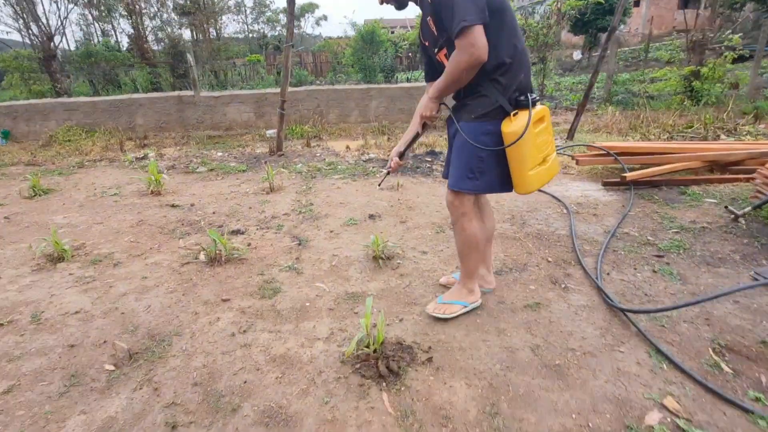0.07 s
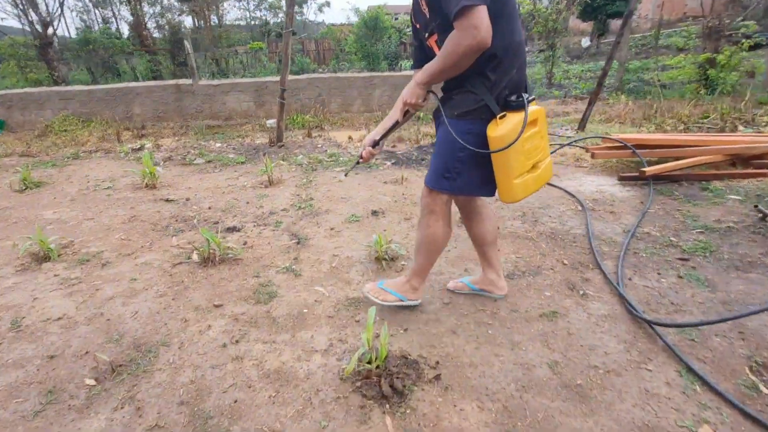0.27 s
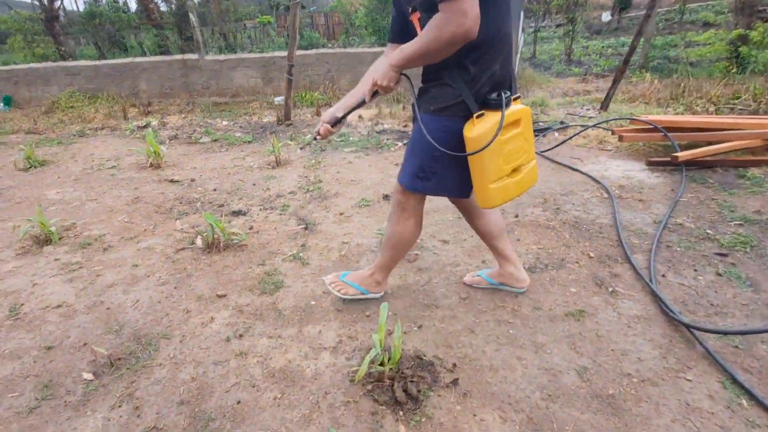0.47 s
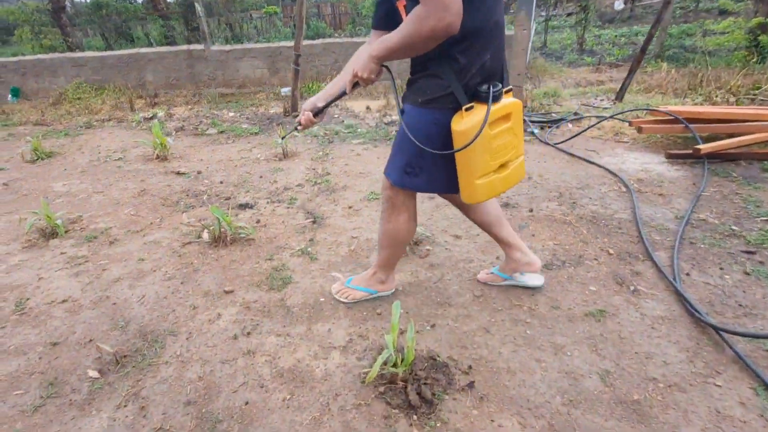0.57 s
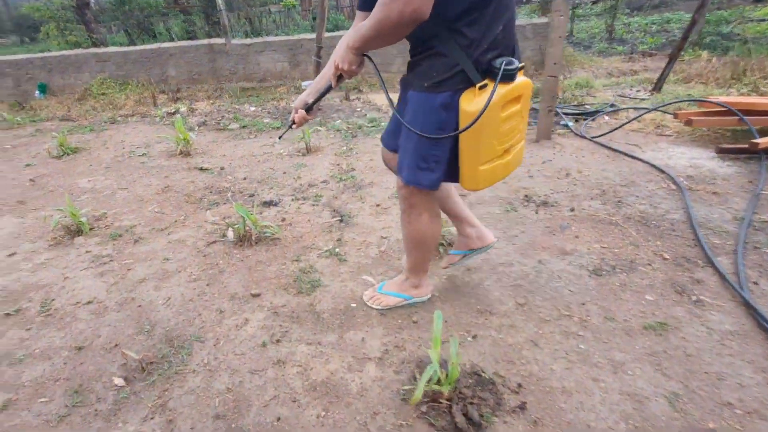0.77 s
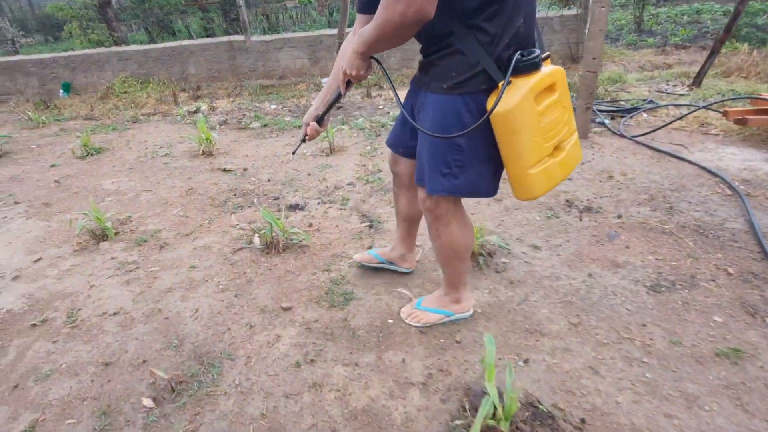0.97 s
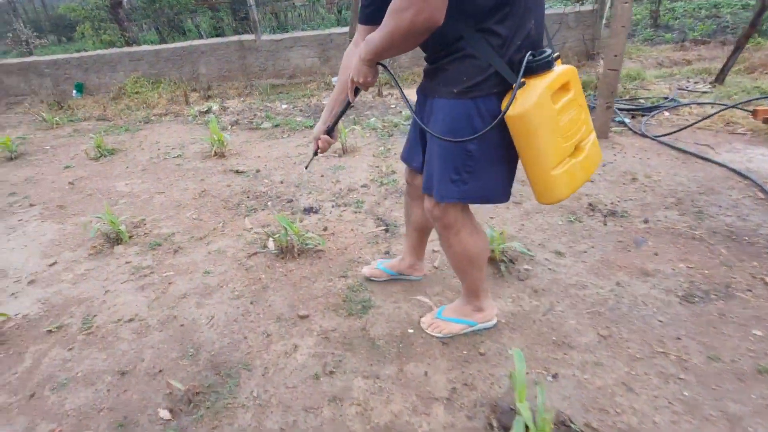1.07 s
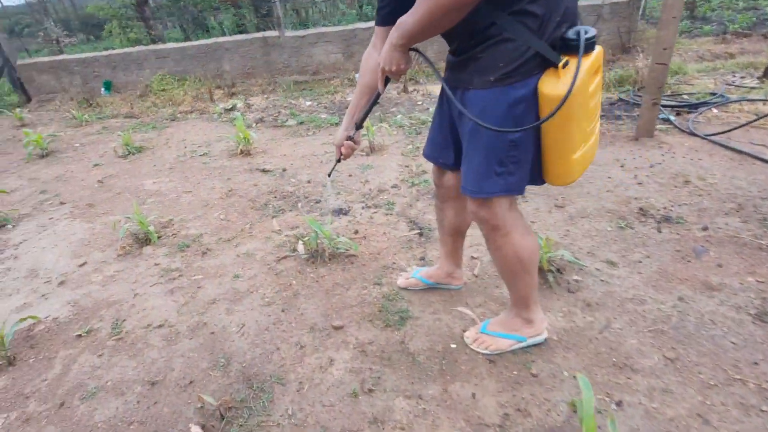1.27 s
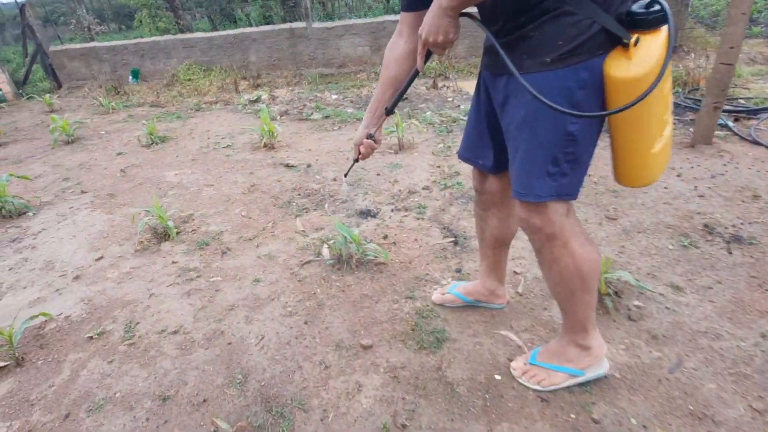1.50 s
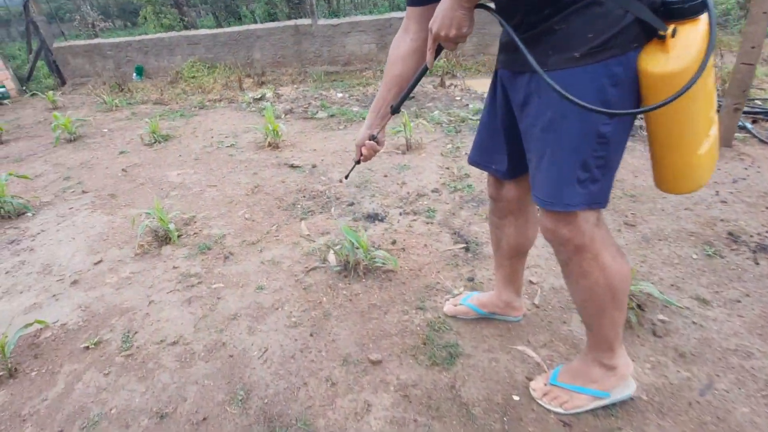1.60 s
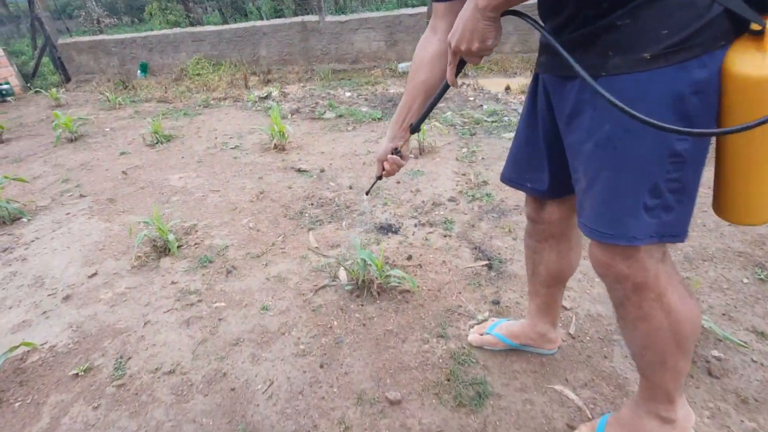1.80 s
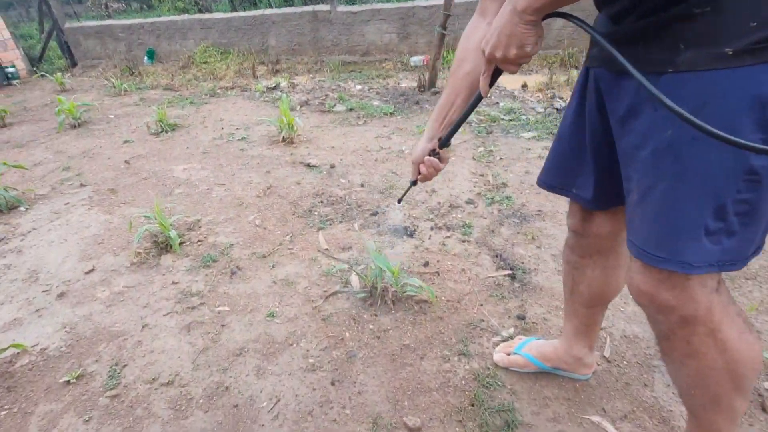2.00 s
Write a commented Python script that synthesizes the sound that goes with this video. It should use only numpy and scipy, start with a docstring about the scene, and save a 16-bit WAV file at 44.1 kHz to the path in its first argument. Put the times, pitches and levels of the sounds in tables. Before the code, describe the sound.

A pressure sprayer hisses twice, its mist pattering on the earth, after soft flip-flop steps scuff over gritty soil. The second squirt is louder and sizzles on leaves. The sounds are close, in a quiet garden with a faint bird chirp.

```python
"""Spraying the garden

A gardener in flip-flops crosses dry, gritty soil: soles scuff and thud, grit ticks.
Two squirts from a pressure sprayer hiss at the nozzle while the mist patters on the earth;
the second is closer and sizzles on a seedling. A small bird calls over quiet garden air."""
import sys
import numpy as np
from scipy.fft import rfft, irfft, next_fast_len
from scipy.io import wavfile
from scipy.ndimage import map_coordinates

SR = 44100
rng = np.random.default_rng(int(sys.argv[2]) if len(sys.argv) > 2 else 0)


def digitize_waveform(pressure):
    """Quantize a signal to 16-bit integers and store it at the path in sys.argv[1].

    Rows of a 2-D input are taken as channels; values are limited to [-1, 1].
    """
    field = np.atleast_2d(pressure).T
    bounded = np.clip(field, -1, 1)
    quanta = np.round(bounded * 32767).astype(np.int16)
    wavfile.write(sys.argv[1], SR, quanta)


N = 90404
DROPS_PER_S, DROP_SPREAD_DB = 2200, 2

# Wide stereo image of scattered sounds: freq_hz, left-right likeness (0-1)
SCATTERED_IMAGE = [(100, 0.93), (600, 0.39), (1500, 0.38), (2800, 0.073), (8000, 0.15), (14000, 0.13)]


def amp(db):
    return 10 ** (np.asarray(db) / 20)


def unit(x):
    return x / np.sqrt(np.mean(x ** 2) + 1e-20)


def along(points, hz):
    """Reads a curve of (freq_hz, value) points on a log axis."""
    freqs, values = np.transpose(points)
    return np.interp(np.log(hz + 1), np.log(freqs + 1), values)


def filtered(x, response):
    """EQs x with a gain given as a function of frequency."""
    size = next_fast_len(N + 8192)
    return irfft(rfft(x, size) * response(np.fft.rfftfreq(size, 1 / SR)), size)[..., :N]


def delayed(x, curve, share=1):
    """Delays one channel by a share of a (time_s, delay_ms) curve."""
    n = np.arange(N)
    lag = np.interp(n / SR, *np.transpose(curve)) * SR / 1000
    return map_coordinates(x, [n - share * lag], order=5, mode="mirror")


def wobble(per_s):
    """A smooth random curve with per_s knots a second."""
    knots = rng.standard_normal(int(N * per_s / SR) + 4)
    return map_coordinates(knots, [np.arange(N) * per_s / SR])


def noise():
    """Two unrelated white noises."""
    return rng.standard_normal((2, N))


def impacts(per_s, spread_db):
    """Two streams of tiny random impacts of uneven size."""
    hits = rng.random((2, N)) < per_s / SR
    return hits * np.sign(noise()) * amp(spread_db * np.clip(noise(), -2, 2))


def placed(pair, spectrum, image=None):
    """Colours two streams and spreads them to stereo at rms 1, the bass narrower than the treble."""
    # Default stereo image, for near sounds: freq_hz, left-right likeness (0-1)
    near_image = [(100, 0.65), (1400, 0.87), (2400, 0.45), (5000, 0.6), (7500, 0.44), (14000, 0.4)]

    def mid_side_gains(hz):
        likeness = along(near_image if image is None else image, hz)
        angle = np.arccos(np.clip(likeness, -1, 1)) / 2
        return amp(along(spectrum, hz)) * [np.cos(angle), np.sin(angle)]

    mid, side = filtered(pair, mid_side_gains)
    return unit(np.array([mid + side, mid - side]))


def stroke(start_s, length_s, rise_s, fall_s):
    """Envelope: linear attack, hold, exponential release."""
    t = np.arange(N) / SR - start_s
    return np.clip(t / rise_s, 0, 1) * np.exp(-np.maximum(t - length_s, 0) / fall_s)


def garden():
    """A bed of faint outdoor air over a distant rumble, both wavering slightly."""
    # Colours of the air and the rumble: freq_hz, level_db
    air_eq = [(100, -6), (220, -6.5), (370, -1.5), (750, -13), (1300, -6.5), (2200, -0.5), (3400, -2),
              (4400, -2), (5600, -3.5), (8100, -4.5), (9100, -16), (10100, -15), (11000, -11), (13800, -8),
              (15500, -14)]
    rumble_eq = [(20, -45), (35, -28), (55, 4.5), (110, 2.5), (200, -11.5), (500, -34)]
    air = amp(-58 + 0.8 * wobble(12)) * placed(noise(), air_eq, SCATTERED_IMAGE)
    rumble = amp(-70 + 0.67 * wobble(7.3)) * placed(noise(), rumble_eq)
    return air + rumble


def bird():
    """Thin, raspy notes from the hedge: narrow bands of noise that glide in pitch."""
    # The call: start_s, length_s, start_hz, end_hz, level_db, rasp_hz
    notes = [(.412, .078, 7150, 8100, -53, 260), (.608, .04, 5700, 4400, -59.5, 200),
             (.644, .028, 4280, 3980, -62, 70), (.62, .06, 6600, 7700, -65, 170)]
    out = np.zeros((2, N))
    for start_s, length_s, start_hz, end_hz, level_db, rasp_hz in notes:
        progress = np.clip((np.arange(N) / SR - start_s) / length_s, 0, 1)
        phase = 2 * np.pi * np.cumsum(start_hz + (end_hz - start_hz) * progress) / SR
        rasp_eq = [(rasp_hz, 0), (2 * rasp_hz, -30), (4 * rasp_hz, -70)]
        note = placed(noise(), rasp_eq) * np.sin(phase) + placed(noise(), rasp_eq) * np.cos(phase)
        out += amp(level_db) * np.sin(np.pi * progress) * note
    return out


def scuffs():
    """Soles drag grains of dry soil; once, the rubber twists on the ground."""
    # Sole drags: start_s, length_s, level_db, centre_hz
    drags = [(0.093, 0.025, -51, 3760), (0.196, 0.048, -56.5, 4470), (0.283, 0.0075, -54.5, 2820),
             (0.5, 0.036, -62, 6000), (0.561, 0.072, -55, 2640), (0.729, 0.057, -55.5, 3700),
             (0.809, 0.05, -48, 2320), (0.892, .12, -54.5, 2150), (1.05, 0.035, -47, 3700),
             (1.662, 0.023, -58.5, 2400)]
    # Colours of loose soil and of rubbing rubber: freq_hz, level_db
    soil_eq = [(150, -14), (400, -20), (700, -3), (1500, 1.5), (2300, -0.5), (3200, -5.5), (5500, -4),
               (8100, -2), (9000, -23), (10200, -10.5), (13000, -5), (16000, -9)]
    rubber_eq = [(600, -18.5), (1400, -13), (2000, -5), (2600, -4.5), (3500, -25), (8000, -21.5),
                 (15000, -24)]
    rise_s, fall_s, width_octaves = 0.0041, 0.038, 1.69

    def grains(eq):
        return placed(impacts(per_s=3600, spread_db=4), eq, SCATTERED_IMAGE)

    out = np.zeros((2, N))
    for start_s, length_s, level_db, centre_hz in drags:
        band = lambda hz: np.exp(-0.5 * (np.log2((hz + 1) / centre_hz) / width_octaves) ** 2)
        scrape = unit(filtered(grains(soil_eq), band))
        out += amp(level_db + 1.6 * wobble(90.2)) * scrape * stroke(start_s, length_s, rise_s, fall_s)
    twist = amp(-52) * grains(rubber_eq) * stroke(0.506, 0.032, rise_s, fall_s)
    return out + twist


def footfalls():
    """Flip-flops land on the earth with soft, low thuds."""
    # Sole landings: start_s, length_s, level_db
    landings = [(0.053, 0.063, -66), (0.428, .02, -68.5), (0.691, .012, -61.5), (1.044, 0.087, -67.5),
                (1.198, 0.021, -61), (1.317, 0.027, -55.5)]
    # Colour of a thud: freq_hz, level_db
    thud_eq = [(100, -38), (250, -9.5), (350, -3.5), (480, -7), (800, -22), (2000, -47)]
    out = np.zeros((2, N))
    for start_s, length_s, level_db in landings:
        envelope = stroke(start_s, length_s, rise_s=0.0067, fall_s=0.019)
        out += amp(level_db) * placed(noise(), thud_eq) * envelope
    return out


def grit_ticks():
    """Each tick of grit or sandal is a dead knock with a tiny crack, then settling dust."""
    # Ticks underfoot: start_s, relative_db, pitch_hz
    ticks = [(.093, -33.5, 2440), (.133, -40, 2200), (0.202, -39, 2200), (0.268, -42, 2600),
             (0.29, -40, 2030), (.309, -45, 1090), (.439, -48, 1520), (.498, -46, 4800), (.590, -35, 1900),
             (0.7, -35, 1400), (.740, -42.5, 1410), (0.7712, -34, 1950), (.804, -37.5, 1380),
             (0.8272, -32, 2000), (.835, -33, 1480), (0.86, -51, 1690), (.950, -34.5, 2100),
             (1.0014, -35.5, 1720), (1.08, -39, 1990), (1.2015, -28, 2600), (1.609, -33.5, 885),
             (1.643, -32.5, 1460), (1.657, -35.5, 2070), (1.684, -46, 1170), (1.711, -40, 2010)]
    # Colour of the crack and dust: freq_hz, level_db
    crack_eq = [(150, -27), (400, 3), (1200, -0.5), (2700, 2.5), (4500, -1), (8000, -5), (9500, -15),
                (15000, -14)]
    rise_s, crack_s, settle_s, ring_cycles = 0.00018, 0.0007, 0.006, 0.93
    low_cut_hz = 474  # small grit radiates little below this
    out = np.zeros((2, N))
    for start_s, relative_db, pitch_hz in ticks:
        t = np.maximum(np.arange(N) / SR - start_s, 0)
        attack = 1 - np.exp(-t / rise_s)
        knock = np.sin(2 * np.pi * pitch_hz * t) * np.exp(-t * pitch_hz / ring_cycles)
        crack = amp(-10) * np.exp(-t / crack_s)
        dust = amp(-18) * np.exp(-t / settle_s)
        out += amp(relative_db + 3.5) * attack * (knock + (crack + dust) * placed(noise(), crack_eq))
    return filtered(out, lambda hz: 1j * hz / (low_cut_hz + 1j * hz))


def leaf_sizzle():
    """The sizzle grows as the cone of mist moves onto the seedling and stays there."""
    # Colour of mist on leaves: freq_hz, level_db
    leaf_eq = [(1000, -32), (2300, -3), (3200, -4.5), (4200, -3), (5700, 2), (6600, -5.5), (7500, -28),
               (10000, -31)]
    start_s, rise_s, level_db = 1.843, 0.1, -37
    drops = placed(impacts(DROPS_PER_S, DROP_SPREAD_DB), leaf_eq)
    mist = placed(noise(), leaf_eq)
    fade_in = np.clip((np.arange(N) / SR - start_s) / rise_s, 0, 1)
    return amp(level_db) * unit(drops + mist) * fade_in


def spray():
    """The jet hisses at the nozzle; fine mist and coarser drops patter where it lands."""
    # Relative level curves, one set per squirt: time_s, hiss_db, patter_db
    squirts = [
        [(1.10, -58, -69), (1.128, -57, -57), (1.138, -46.5, -51), (1.21, -46.5, -44.5), (1.33, -40.5, -41.5),
         (1.43, -39.5, -42.5), (1.53, -47, -45), (1.565, -42.5, -49.5), (1.60, -52, -54.5), (1.66, -66, -56.5),
         (1.69, -69, -73)],
        [(1.736, -53, -60), (1.752, -44, -51), (1.775, -43.5, -44.5), (1.80, -41.5, -43.5), (1.855, -37, -37.5),
         (1.93, -35, -38.5), (1.98, -35, -37), (2.05, -35.5, -37)],
    ]
    # Colours of the nozzle and, per squirt, of the patter on the earth: freq_hz, level_db
    nozzle_eq = [(300, -32), (1500, -13.5), (3500, -4), (6000, -1), (8000, -1), (9200, -9), (11000, -3),
                 (13000, 0.5), (15500, -0.5)]
    patter_eqs = [
        [(150, -23.5), (420, -15), (600, -4.5), (1200, -2.5), (1950, 1.5), (2600, -5), (4000, -7), (5800, -5.5),
         (8200, -3.5), (9300, -14), (15000, -13)],
        [(150, -26.5), (330, -12.5), (600, -10), (1200, -3), (2000, 3), (2700, -1.5), (4000, -6), (5800, -6),
         (8000, -13), (9300, -22), (15000, -8.5)],
    ]
    valve_s = 0.0077  # attack and release of the trigger valve
    t = np.arange(N) / SR
    out = np.zeros((2, N))
    for squirt, patter_eq in zip(squirts, patter_eqs):
        time_s, hiss_db, patter_db = np.transpose(squirt)
        hiss = amp(5.5 + np.interp(t, time_s, hiss_db)) * placed(noise(), nozzle_eq)
        mist = amp(1.5) * placed(noise(), patter_eq)
        drops = placed(impacts(DROPS_PER_S, DROP_SPREAD_DB), patter_eq)
        patter = amp(np.interp(t, time_s, patter_db) + 1.23 * wobble(70)) * (mist + drops)
        trigger = stroke(time_s[0], time_s[-1] - time_s[0], valve_s, valve_s)
        out += (hiss + patter) * trigger
    return out


def ground_bounce(pair):
    """Adds a reflection off the ground whose delay shifts as the wand is raised: a light flange."""
    # Lag of the reflection: time_s, delay_ms
    lag = [(1.15, .8), (1.4, 1.05), (1.5, 1.27), (1.62, 1.45), (1.74, .55), (1.83, .88), (1.9, 1.1),
           (2.02, 1.42)]
    return pair + amp(-12.5) * np.array([delayed(channel, lag) for channel in pair])


def drift_to_centre(pair):
    """Sound reaches the left microphone first; the lead shrinks and the image slides to the centre."""
    # Left lead, of which each channel takes a share: time_s, lead_ms
    lead = [(0, .14), (1.2, 0.079), (1.42, 0.036), (1.82, 0.011), (1.96, 0.0071)]
    return np.array([delayed(pair[0], lead, share=-0.46), delayed(pair[1], lead, share=0.47)])


def scene():
    """Sprayer in front, feet a little to the left, garden and bird behind."""
    sprayer = ground_bounce(spray() + leaf_sizzle())
    feet = (scuffs() + footfalls() + grit_ticks()) * amp([[1.2], [-1.2]])
    return drift_to_centre(sprayer + feet + garden()) + bird()


def record(dry):
    """The two microphones differ slightly in colour; deep bass and the very top are cut."""
    # Microphone balance: freq_hz, left_minus_right_db
    balance = [(100, 2.3), (700, 2.5), (1300, -0.5), (2400, 1), (4400, 1.9), (8100, 1.5), (14000, 1.5)]
    low_cut_hz, top_hz = 38, 15850

    def response(hz):
        colour = amp(np.outer([0.5, -0.5], along(balance, hz)))
        band = (hz < top_hz) * hz ** 4 / (hz ** 4 + low_cut_hz ** 4)
        return colour * band

    return filtered(dry, response)


dry = scene()
out = record(dry)
digitize_waveform(out)
```